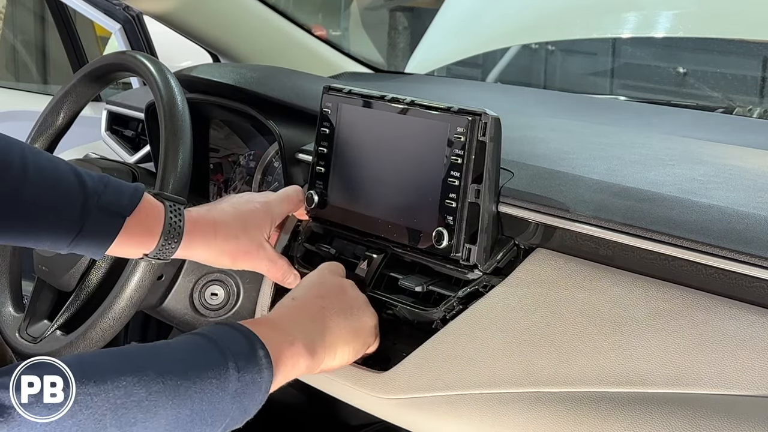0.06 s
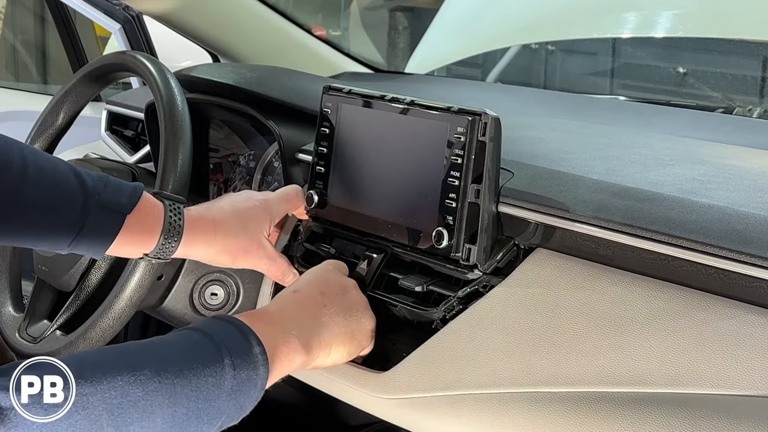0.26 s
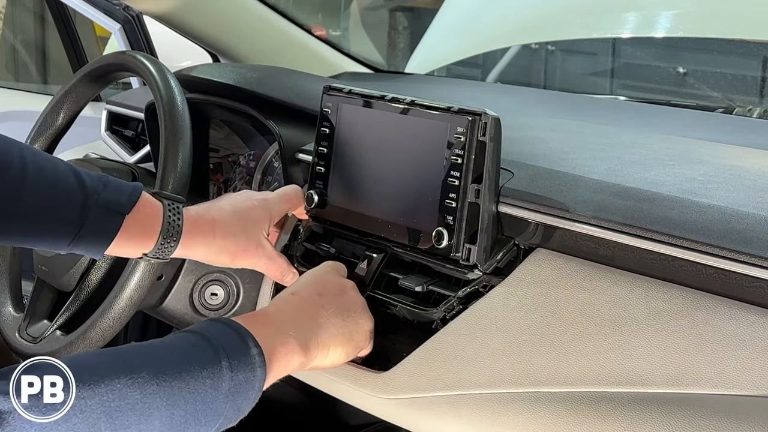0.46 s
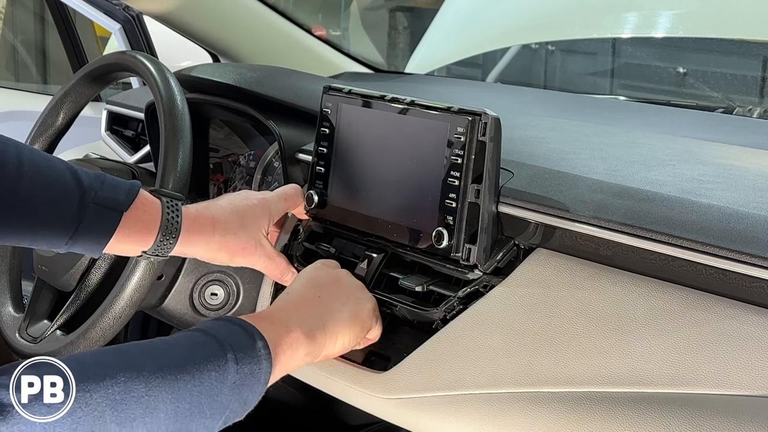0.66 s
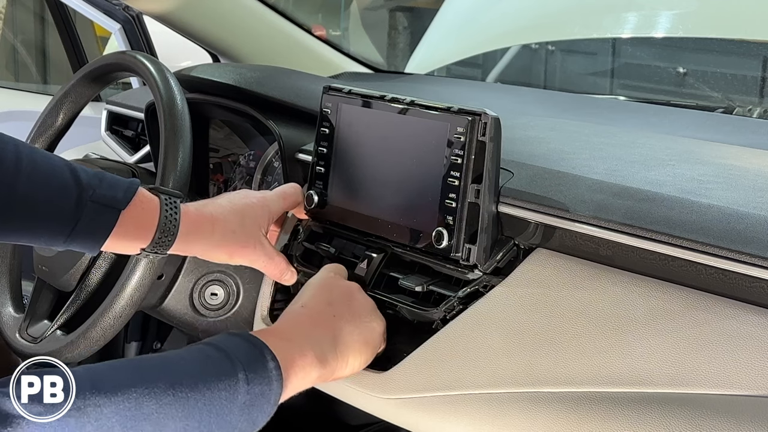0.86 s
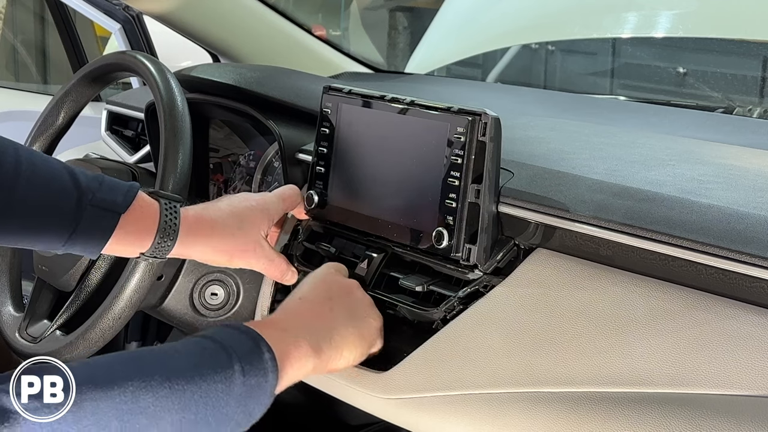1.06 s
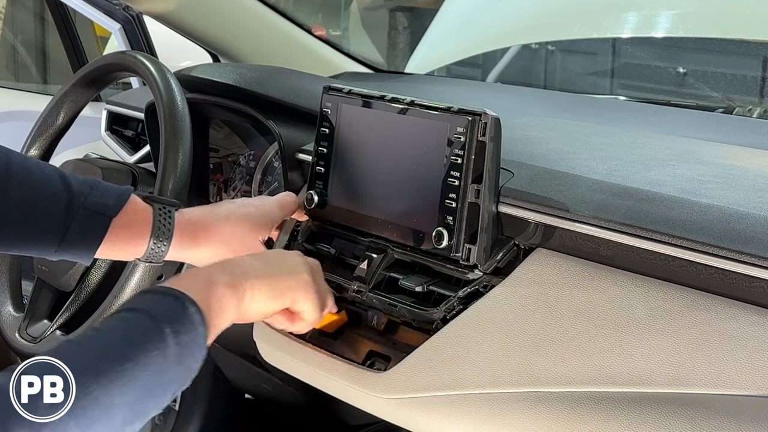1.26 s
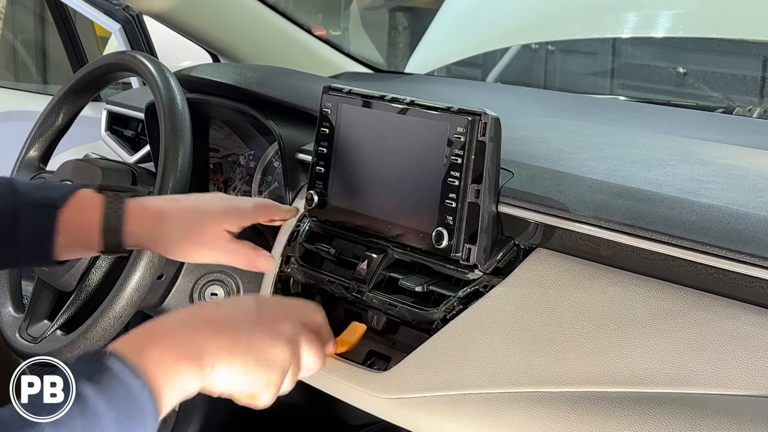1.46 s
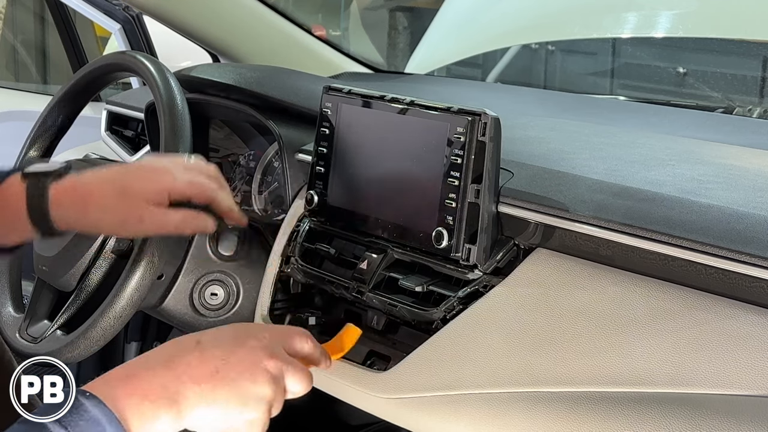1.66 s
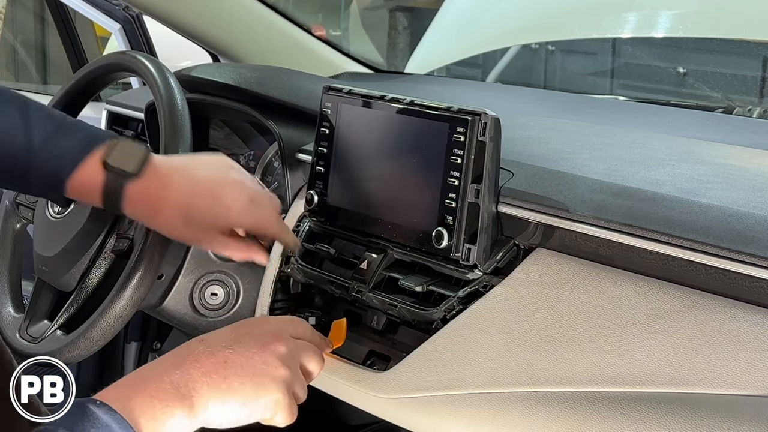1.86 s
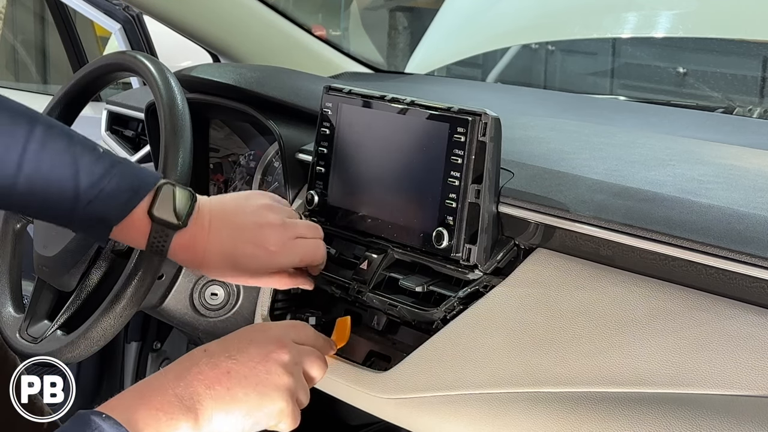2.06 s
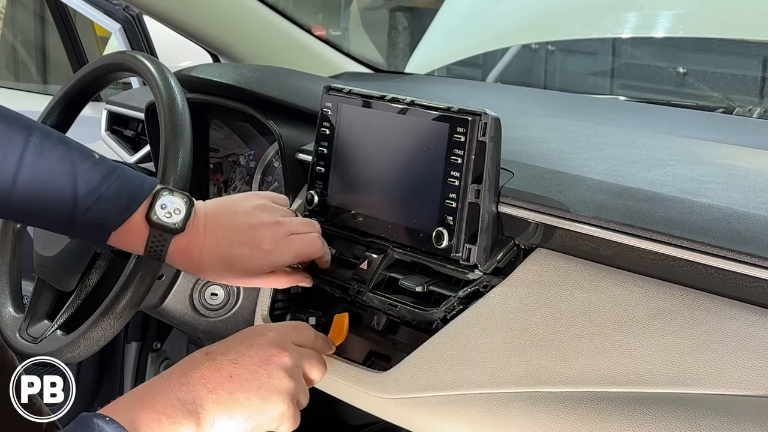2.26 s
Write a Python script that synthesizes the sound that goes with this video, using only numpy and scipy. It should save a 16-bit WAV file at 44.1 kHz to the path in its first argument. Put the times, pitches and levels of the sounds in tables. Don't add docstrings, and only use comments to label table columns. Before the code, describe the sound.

Hard plastic trim being pried off a dashboard in a parked car: one very loud, clipped pop near the start, a softer knock, then small clicks, rubbing and a rapid creak, heard by a close microphone.

```python
import sys
import numpy as np
from scipy import signal
from scipy.fft import rfft, irfft
from scipy.io import wavfile
from scipy.ndimage import uniform_filter1d

SR = 44100
rng = np.random.default_rng(int(sys.argv[2]) if len(sys.argv) > 2 else 0)


def file_out(sig):
    cols = np.atleast_2d(sig).T
    lim = np.clip(cols, -1, 1)
    pcm = np.round(lim * 32767).astype(np.int16)
    wavfile.write(sys.argv[1], SR, pcm)


def natural_amplitude(level_db):
    exponent = np.asarray(level_db, float) / 20
    return 10 ** exponent


N = 101429
T = np.arange(N) / SR

# start_s, level_db, contact_s, centre_hz (centre of colour)
BLOWS = [(.2204, -8.5, 0.004, 970), (.2215, -13, 0.005, 131), (.130, -58, 0.0042, 507),
         (0.4074, -28, 0.00844, 370), (.615, -47.5, 0.0048, 210), (.746, -43.5, 0.0053, 205),
         (.816, -48, 0.0017, 884), (.920, -45, 0.011, 210), (1.007, -40, 0.0072, 208),
         (1.068, -31, 0.031, 132), (1.110, -39.5, 0.02, 1410), (1.158, -41.5, .02, 600),
         (1.270, -42.5, 0.0056, 318), (1.442, -24, 0.011, 258), (1.624, -38, 0.039, 163),
         (1.834, -38, .011, 424), (1.853, -40, 0.019, 470), (1.878, -38.5, 0.0086, 299),
         (2.109, -39.5, 0.0082, 520), (2.209, -59.5, 0.0075, 315), (2.274, -73, 0.014, 304)]
# pitch_hz, level_db, t60_s
PANEL_MODES = [(88, -16, 0.067), (123.7, -5.5, 0.14), (155, -8.5, 0.19), (241.2, -4.5, 0.04),
               (312, -10.5, 0.1), (351, -2.5, 0.083), (415, -6.5, 0.083), (518.5, -1, 0.029),
               (633, 2.5, 0.017), (994, 0.5, 0.045), (1254, -3, 0.042), (1438, 1, 0.024), (1839, -8, 0.13),
               (2220, -12.5, .03)]
# start_s, level_db, pitch_hz, t60_s
CABIN_BOOMS = [
    (0.239, -30, 42.7, 0.46),
    (0.256, -27.5, 84.5, 0.32),
    (0.418, -38, 39.9, 0.71),
    (0.432, -26, 90, 0.23),
    (0.439, -33.5, 149.8, .2),
    (1.459, -27, 39.04, 1),
]
# start_s, peak_db, centre_hz, t60_s
CLIP_CRACKS = [(0.2205, 1, 6335, 0.021), (0.246, -32, 5000, 0.024), (0.4082, -27, 4600, 0.026),
               (0.412, -39, 5960, 0.029), (0.475, -41.5, 5400, .012), (0.4895, -36, 7850, 0.039),
               (0.517, -53, 5800, 0.1), (0.5831, -44, 7350, 0.029), (.675, -53, 3450, .03),
               (0.679, -54, 8970, .05), (.739, -48.5, 5600, 0.01), (0.7434, -46, 6300, 0.041),
               (0.818, -40.5, 5630, 0.0053), (.845, -47, 5380, 0.0035), (0.8637, -46.5, 4400, 0.02),
               (0.9218, -43.5, 4800, 0.0056), (0.944, -44, 9000, 0.0092), (1.0081, -38.5, 9000, 0.006),
               (1.0171, -39.5, 3750, 0.022), (1.038, -42.5, 5770, 0.005), (1.1143, -44, 7050, .015),
               (1.1238, -37.5, 3470, 0.051), (1.2292, -45, 6640, 0.061), (1.2595, -38.5, 4630, 0.023),
               (1.3944, -45.5, 3960, 0.01), (1.4202, -42.5, 3883, 0.012), (1.4431, -38, 2653, 0.1),
               (1.5765, -43.5, 5130, 0.0058), (2.1105, -34, 2830, 0.064), (2.182, -53, 3980, 0.039)]
# start_s, peak_db, centre_hz
SEAT_SLIPS = [(1.670, -47, 7000), (1.683, -40, 3930), (1.697, -40, 8430), (1.704, -36, 6000),
              (1.713, -37, 6000), (1.7287, -36.5, 5190), (1.73, -64, 5000), (1.7432, -30.5, 4850),
              (1.755, -40, 8120), (1.759, -37, 7750), (1.764, -47.5, 8920), (1.766, -37, 4570),
              (1.7881, -42.5, 5900), (1.790, -53.5, 7960), (1.8012, -31, 4200), (1.808, -42, 4500),
              (1.825, -53, 9000), (1.8337, -38, 4470), (1.840, -42.5, 4030), (1.922, -44, 8640),
              (1.925, -41.5, 6860), (1.93, -47, 11100)]
# start_s, length_s, level_db, centre_hz, width_octaves
RUB_STROKES = [(0.0, 0.018, -57.5, 1210, 1.28), (0.14, 0.073, -68.5, 1500, 2.4),
               (.906, 0.043, -60.5, 4870, 1.6), (.956, 0.044, -53.5, 3460, 2.3),
               (.961, 0.042, -52, 1260, 0.51), (1.027, .12, -62, 6470, 0.16),
               (1.052, 0.057, -68, 15100, .1), (1.041, .191, -56, 3600, 2.4),
               (1.141, 0.079, -69.5, 7850, 0.32), (1.111, 0.037, -45, 1540, 1.23),
               (1.129, .16, -47, 670, 1.34), (1.233, 0.14, -49.5, 530, 2.77),
               (1.061, 0.313, -53.5, 155, 1.2), (1.272, 0.094, -54.5, 8470, 1.5),
               (1.255, 0.048, -54, 2510, 2), (1.371, 0.35, -62, 2471, 3.9), (1.501, 0.2335, -58, 351, 1.14),
               (1.6, 0.2315, -59.5, 1540, 2), (1.66, .15, -61.5, 3980, 2.4), (1.831, 0.09, -62, 3510, 4.4),
               (2.248, .061, -69.5, 2580, 1.42)]
# time_s, level_db
CAR_SHAKE = [
    (0, -61),
    (.6, -66),
    (0.949, -55.5),
    (1.2, -45),
    (1.5, -41.5),
    (1.782, -51),
    (1.879, -42),
    (1.98, -59),
    (2.3, -64),
]
# frequency_hz, density_db (per Hz)
AIR_SPECTRUM = [(60, -3), (110, -16), (230, -20.5), (680, -23.5), (1000, -30.5), (2470, -41), (5000, -47),
                (16000, -53)]


def level(x, db):
    return x * natural_amplitude(db) / np.sqrt(np.mean(x ** 2))


def bell(x, hz, octaves):
    f = np.maximum(np.arange(len(x) // 2 + 1) * SR / len(x), 1)
    weight = np.exp(-.5 * (np.log2(f / hz) / octaves * 2) ** 2)
    return irfft(rfft(x) * weight / np.sqrt(f), len(x))


def band(x, hz, octaves):
    edges = np.clip(hz * 2. ** np.array([-octaves / 2, octaves / 2]), 20, SR * 9 // 20)
    return signal.sosfilt(signal.butter(2, edges, "bandpass", fs=SR, output="sos"), x)


def fade(t, t60):
    return np.exp(-np.log(1000) * t / t60)


def walk(rate_hz, size=N):
    hold = int(SR / rate_hz)
    steps = rng.standard_normal(size)[np.arange(size) // hold]
    return 1.3 * uniform_filter1d(uniform_filter1d(steps, hold), hold)


def add(out, start_s, x):
    i = int(start_s * SR)
    out[i:i + len(x)] += x[:N - i]


def knocks():
    scatter_db, detune, colour_octaves, longest_t60_s = 4.5, 0.019, 1.387, .15
    out, t = np.zeros(N), T[:2 ** 13]
    mode_hz, mode_db, t60 = np.array(PANEL_MODES).T[:, :, None]
    for start_s, knock_db, contact_s, centre_hz in BLOWS:
        luck = rng.standard_normal((2, len(PANEL_MODES), 1))
        grit = rng.standard_normal(len(t))
        ragged = grit * natural_amplitude(4.42 * np.abs(np.roll(grit, 1)))
        force = ragged * t / contact_s * np.exp(-(t / contact_s) ** 2)
        ring = np.sin(2 * np.pi * mode_hz * (1 + detune * luck[1]) * t)
        ring = ring * fade(t, np.minimum(t60, longest_t60_s))
        ring = irfft(rfft(ring) * rfft(force), len(t))
        ring = ring / np.abs(ring).max(axis=1, keepdims=True)
        colour_db = -5.4 * (np.log2(mode_hz / centre_hz) / colour_octaves) ** 2
        gain = natural_amplitude(mode_db + scatter_db * luck[0] + colour_db)
        add(out, start_s, natural_amplitude(knock_db - 4.5) * (gain * ring).sum(axis=0))
    return out


def cracks():
    out, t = np.zeros(N), T[:SR // 8]
    for start_s, peak_db, hz, t60 in CLIP_CRACKS:
        noise = rng.standard_normal((2, len(t)))
        burst = band(noise[0] * fade(t, t60), hz, 2.32)
        body = band(noise[1] * fade(t, 1.8 * t60), hz / 2, 1.4)
        snap = band(noise[0] * fade(t, t60 / 2), hz, 0.64)
        x = burst + natural_amplitude(-2) * body + natural_amplitude(2.5) * snap
        add(out, start_s, x * natural_amplitude(peak_db) / np.abs(x).max())
    return out


def slips():
    t60_s, edge_hz, edge_db = .008, 3950, 3.5
    out, t = np.zeros(N), T[:SR // 40]
    for start_s, peak_db, hz in SEAT_SLIPS:
        tick = (0.24 * rng.standard_normal(len(t)) + (t == 0)) * fade(t, t60_s)
        x = band(tick, hz, 1.9) + natural_amplitude(edge_db) * band(tick, edge_hz, 0.88)
        add(out, start_s, x * natural_amplitude(peak_db) / np.abs(x).max())
    return out


def rubs():
    edge_s, grain_db, flicker_db = .022, 4.5, 1.5
    peaks_db, peak_share = 2.2, .07
    sag_per_s = 1.8
    out, t = np.zeros(N), T[:2 ** 14]
    for start_s, length_s, rub_db, hz, octaves in RUB_STROKES:
        unevenness = np.minimum(rng.exponential(size=len(t)), 3.5)
        grains = rng.standard_normal(len(t)) * natural_amplitude(grain_db * unevenness)
        bins = int(peak_share * hz * len(t) / SR) + 2
        peaks = uniform_filter1d(rng.standard_normal(len(t) // 2 + 1), bins) * np.sqrt(bins)
        peaks = uniform_filter1d(peaks, bins // 2)
        grains = irfft(rfft(grains) * natural_amplitude(peaks_db * peaks), len(t))
        shape = np.clip(np.minimum(t, length_s + edge_s - t) / edge_s, 0, 1) ** 2
        flicker = natural_amplitude(flicker_db * (walk(37.7, size=len(t)) + walk(220, size=len(t))))
        sag = sag_per_s * np.minimum(1000 / hz, 1)
        slowed_t = t * (1 + sag * (length_s - t) / 2)
        stroke = np.interp(slowed_t, t, bell(grains, hz, octaves))
        add(out, max(start_s - edge_s / 2, 0), shape * flicker * level(stroke, rub_db))
    return out


def booms():
    rise_s = 0.031
    out, t = np.zeros(N), T[:SR // 2]
    for start_s, boom_db, hz, t60 in CABIN_BOOMS:
        swell = fade(t, t60) * (1 - np.exp(-t / rise_s))
        add(out, start_s, natural_amplitude(boom_db) * np.sin(2 * np.pi * hz * t) * swell)
    return out


def hall(near):
    tail_db, tilt_db_per_octave, t60_s, rise_s = -22.5, -2, 0.43, 0.004
    keeps = (fade(1 / SR, t60_s) ** 2, np.exp(-1 / (SR * rise_s)))
    out = 0
    for octave in range(7):
        hz = 180 * 2 ** octave
        power = band(near, hz, 1) ** 2
        for keep in keeps:
            power = signal.lfilter([1 - keep], [1, -keep], power)
        octave_db = tail_db + tilt_db_per_octave * (octave - 3)
        out = out + np.sqrt(power) * level(band(rng.standard_normal(N), hz, 0.91), octave_db)
    return out


def cabin():
    air_db, sway_db = -56.5, -37.5
    f = np.maximum(np.arange(N // 2 + 1) * SR / N, 1)
    air_hz, density_db = np.array(AIR_SPECTRUM).T
    shake_s, shake_db = np.array(CAR_SHAKE).T
    spectrum = natural_amplitude(np.interp(np.log(f), np.log(air_hz), density_db)) * (f > 50)
    air = irfft(rfft(rng.standard_normal(N)) * spectrum, N)
    air = level(air, air_db) * natural_amplitude(1.5 * walk(7.4))
    sway = level(bell(rng.standard_normal(N), 6.87, 1.3), sway_db)
    rumble = level(bell(rng.standard_normal(N), 67, 2.42), 0)
    rumble = rumble * natural_amplitude(np.interp(T, shake_s, shake_db) + 3.7 * walk(14))
    return air + sway + rumble


def scene():
    near = knocks() + cracks() + slips() + booms()
    return (near + hall(near) + rubs() + cabin())[None]


def top_cut(x):
    return signal.sosfilt(signal.butter(12, 16680, fs=SR, output="sos"), x)


def record(dry):
    overload = .64
    squashed = dry / np.sqrt(np.sqrt(1 + (dry / overload) ** 4))
    return top_cut(squashed)


dry = scene()
out = record(dry)
file_out(out)
```